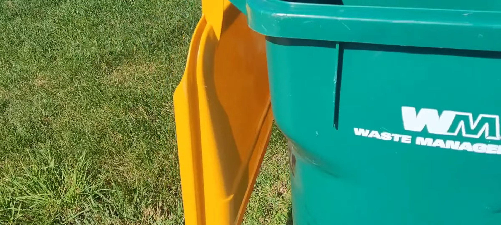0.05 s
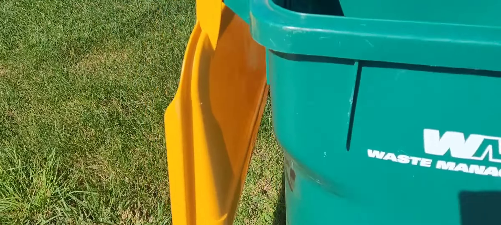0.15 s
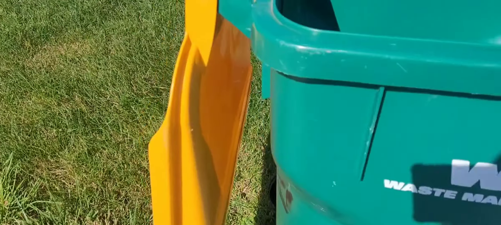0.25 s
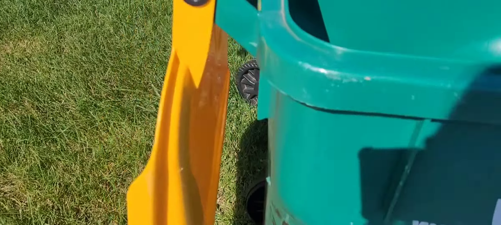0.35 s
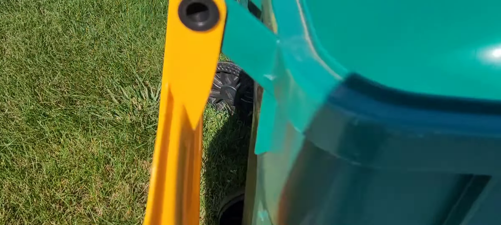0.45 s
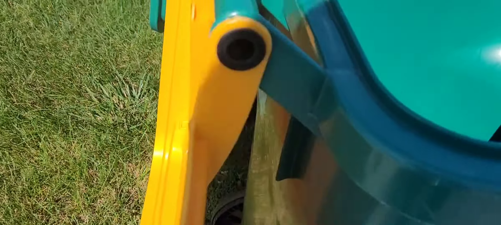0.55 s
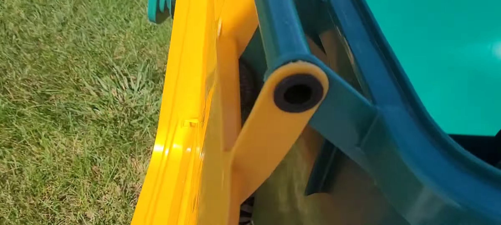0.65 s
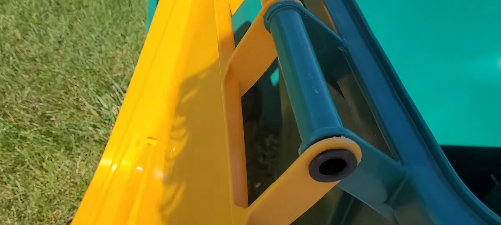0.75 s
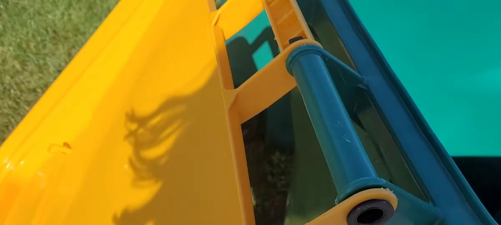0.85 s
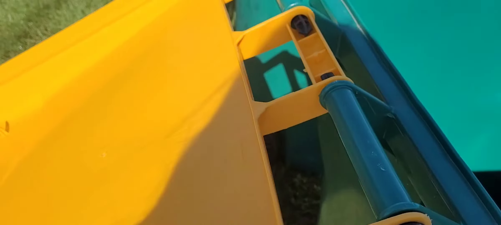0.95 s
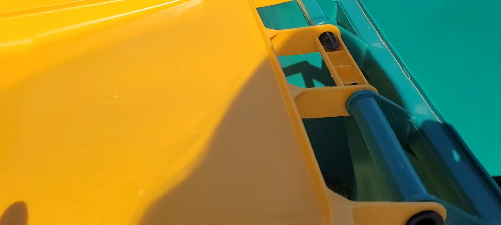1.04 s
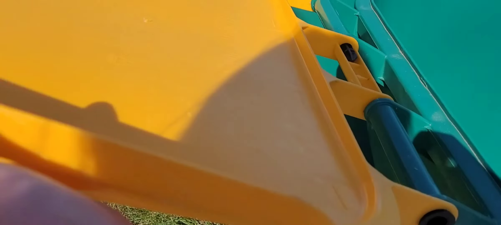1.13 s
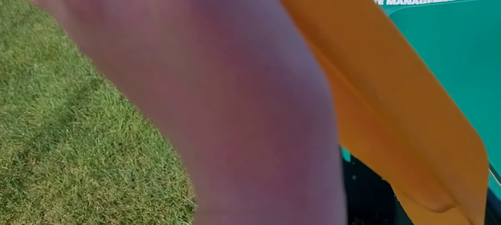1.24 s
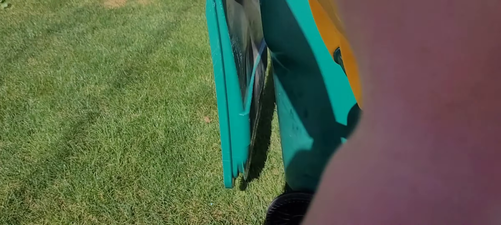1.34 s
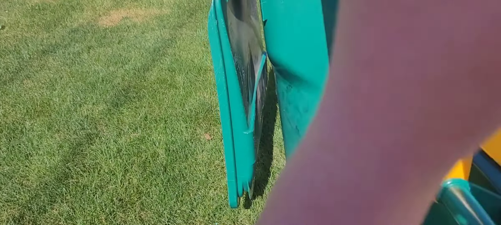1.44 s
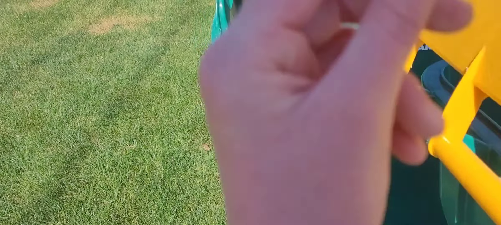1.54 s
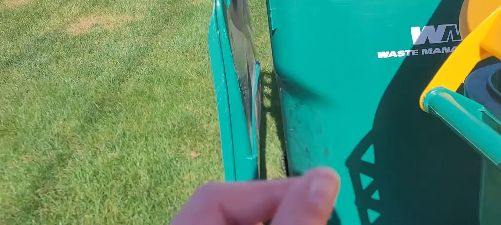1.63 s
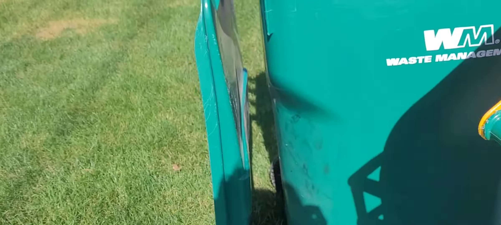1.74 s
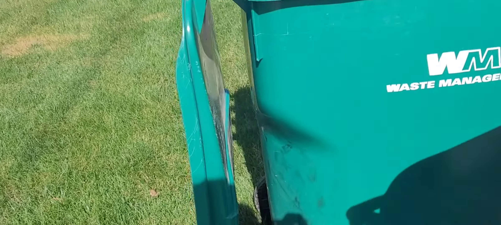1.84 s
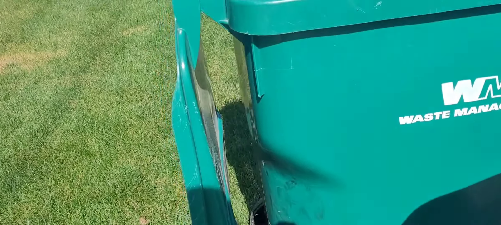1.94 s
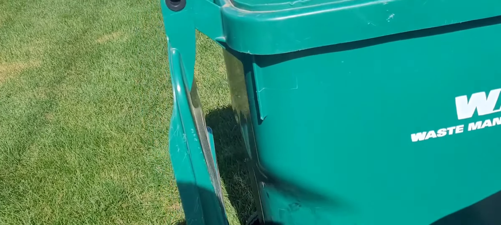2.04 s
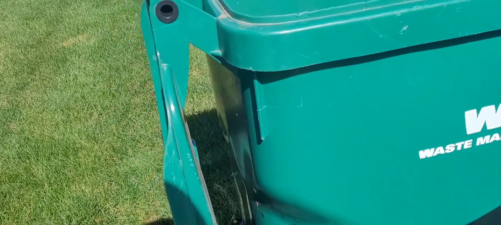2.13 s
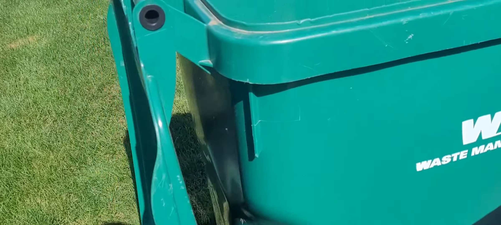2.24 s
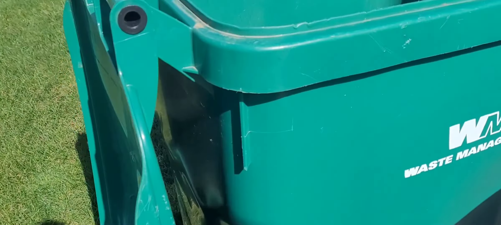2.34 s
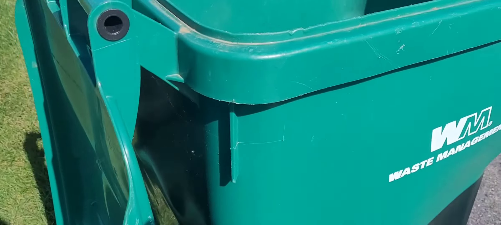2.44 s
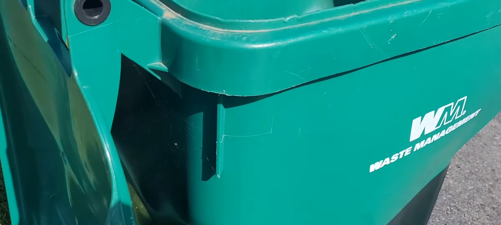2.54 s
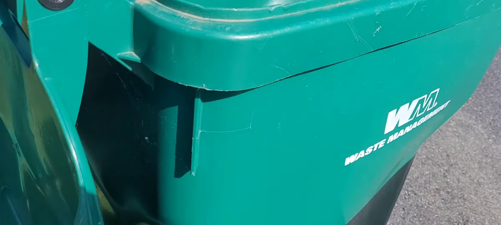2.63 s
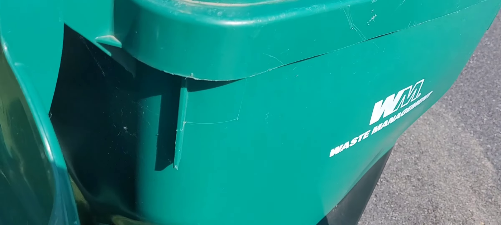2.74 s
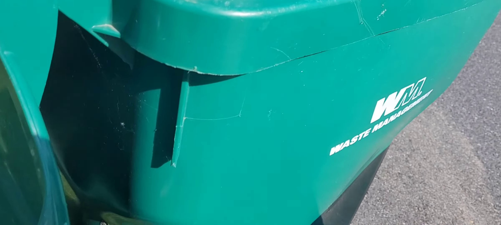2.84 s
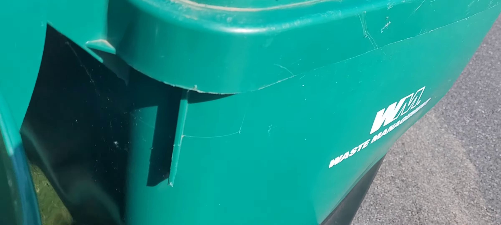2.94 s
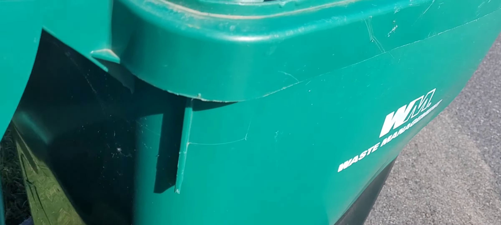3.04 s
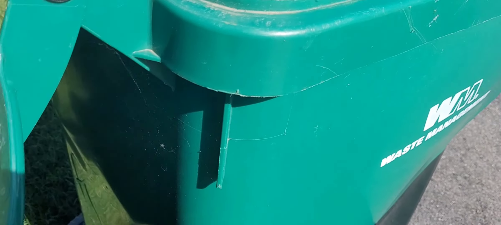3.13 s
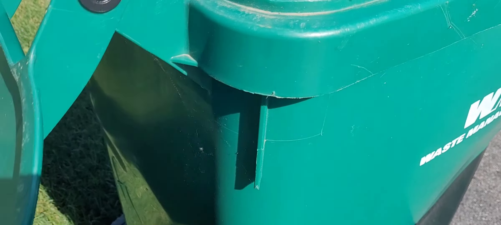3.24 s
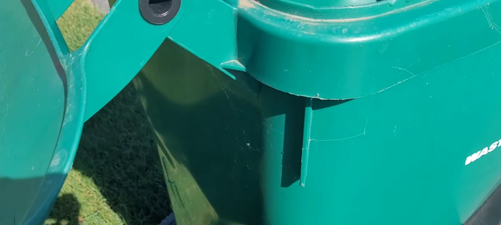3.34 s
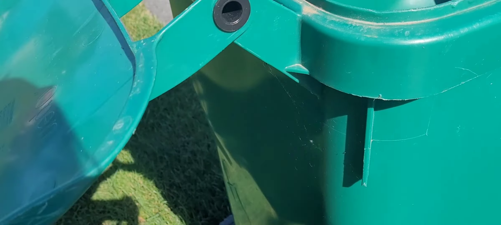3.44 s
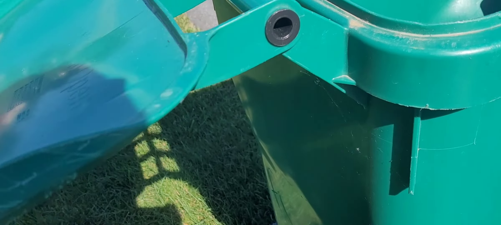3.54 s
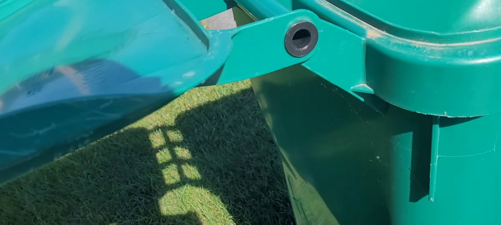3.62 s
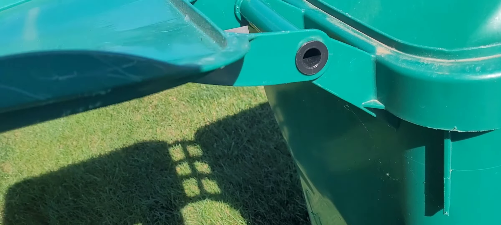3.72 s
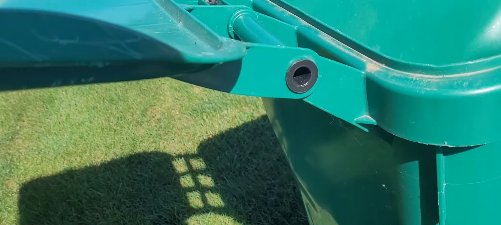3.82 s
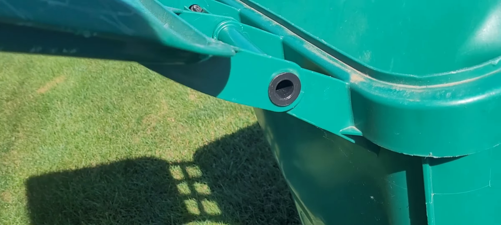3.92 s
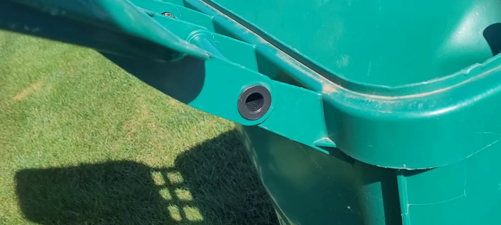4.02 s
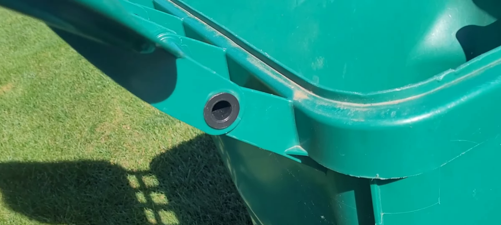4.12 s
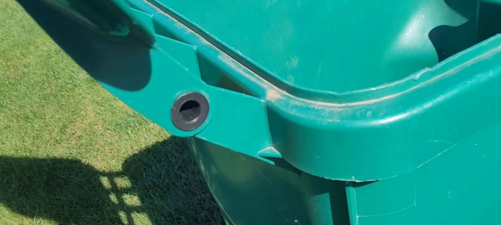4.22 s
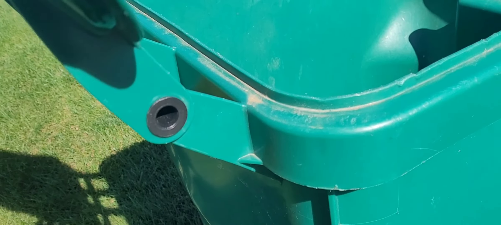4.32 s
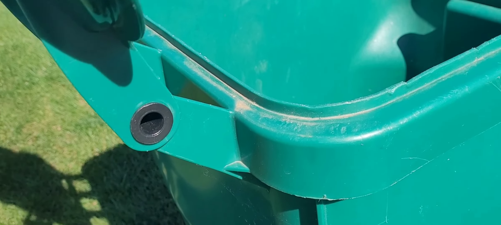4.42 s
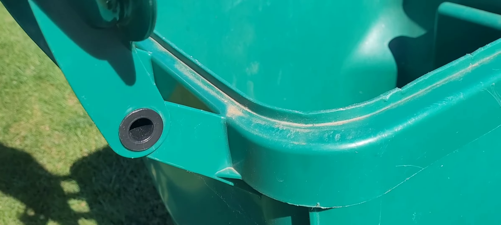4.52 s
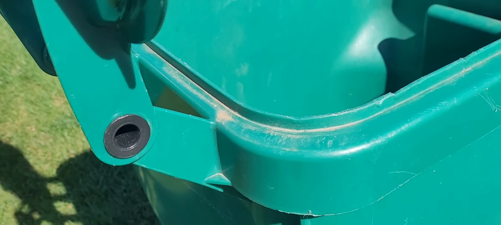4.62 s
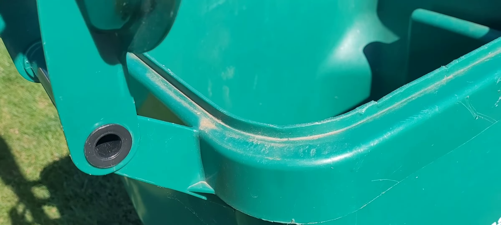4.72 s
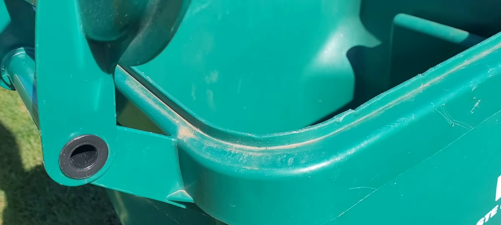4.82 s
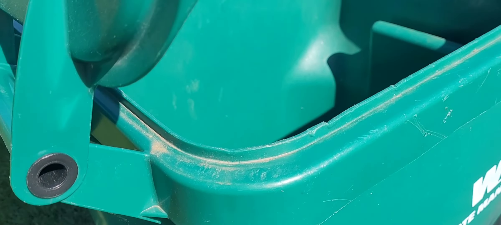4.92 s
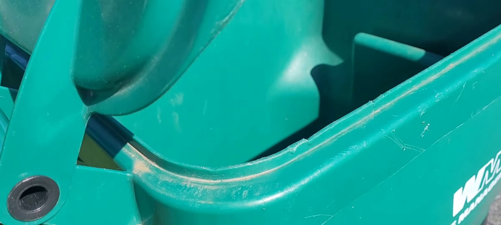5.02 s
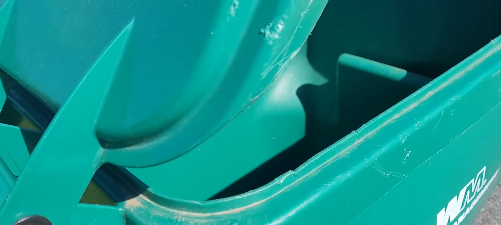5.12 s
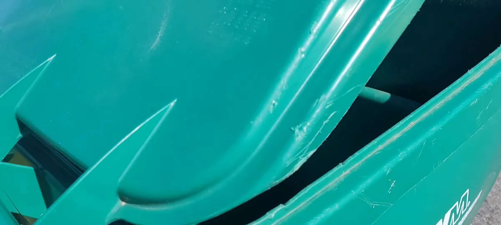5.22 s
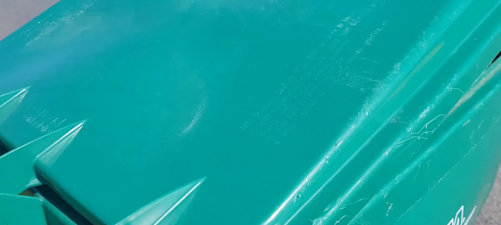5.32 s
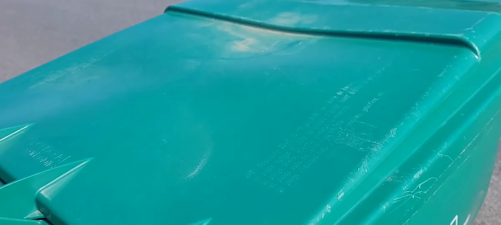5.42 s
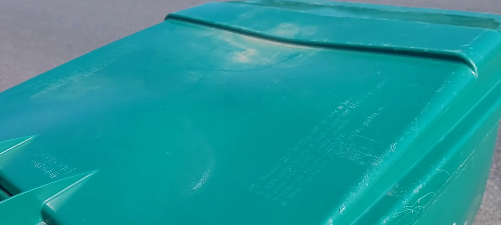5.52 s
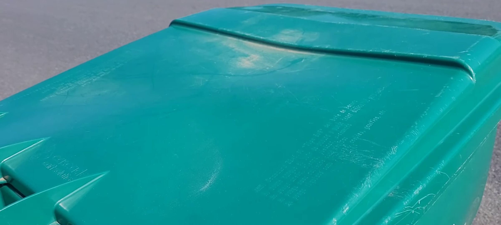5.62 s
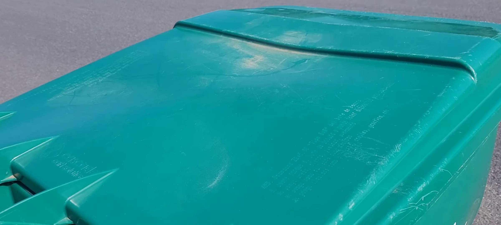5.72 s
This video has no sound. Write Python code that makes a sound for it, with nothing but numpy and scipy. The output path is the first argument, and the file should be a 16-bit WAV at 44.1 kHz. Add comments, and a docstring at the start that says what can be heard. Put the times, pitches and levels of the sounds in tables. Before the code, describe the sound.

An empty plastic wheeled bin is moved outdoors, close to the microphone, with an uneven hollow rumble and light rattle throughout. Low wind buffets the microphone in gusts. In the first second there are small knocks, short plastic creaks and brushing scuffs. At about 1.1 seconds the lid hits with a sharp, short clack. At 1.9 seconds it slams loudly, flapping on the rim with a deep boom that dies within half a second. The rolling is quieter until a sharp tick at 3 seconds, then picks up with dull bumps and faint hinge rubbing from 3.3 to 5 seconds. Two distant birds chirp and whistle faintly, mostly between 3 and 5.3 seconds, over a very soft outdoor hush. At 5.4 seconds the lid slams and bounces, two loud, hollow, clattering bangs that fade quickly into the rumble.

```python
"""Rolling a plastic wheeled bin

An empty bin is handled and rolled outdoors, close to a phone with two spaced microphones. Grit under
the wheels drives the resonances of the hollow body, and the lid slams and flaps on the rim. The plastic
knocks and creaks, and hands and feet scuff with friction noise. Eddies of wind buffet the microphones,
and two birds sing further off over a faint outdoor wash."""
import sys
import numpy as np
from scipy import signal
from scipy.fft import rfft, irfft, next_fast_len
from scipy.io import wavfile
from scipy.ndimage import uniform_filter1d

SR = 44100
rng = np.random.default_rng(int(sys.argv[2]) if len(sys.argv) > 2 else 0)


def master(y):
    """Save y as 16-bit WAV."""
    cut = np.clip(np.atleast_2d(y).T, -1, 1)
    pcm = np.round(cut * 32767)  # scale
    wavfile.write(sys.argv[1], SR, pcm.astype(np.int16))


N = 254127
T = np.arange(N) / SR

# modes of the bin's walls: (frequency [Hz], bandwidth [Hz], relative level [dB])
WALL_MODES = [(162, 16.7, -1.5), (231.6, 26.6, 0.5), (274.8, 61.5, 1), (363.5, 33.7, -1.5),
              (431, 33.5, -7.5), (560, 167, -9.5), (652, 20, -17)]
# the phone turns: (time [s], delay at the left microphone [s], rolling level left minus right [dB])
BEARING = [(0, 0.00035, -1.5), (.8, 0.00044, -2.5), (1.1, 0.00014, -1.5), (1.5, 0.0003, -5),
           (1.7, 0.00039, 4), (1.9, 0.0003, -0.5), (2.8, 0.00026, -1.5), (3.6, 0.00036, -2),
           (4.9, 0.00042, -1), (5.3, 0.00015, -2.5)]


def undb(db):
    """Amplitude ratio of a level in decibels."""
    return 10 ** (np.asarray(db) / 20)


def unit(x):
    """Normalisation to an rms of 1."""
    return x / np.sqrt(np.mean(x ** 2))


def curves(table):
    """Linear interpolation in time of every column after the first."""
    times, *columns = np.transpose(table)
    return np.array([np.interp(T, times, column) for column in columns])


def ring(x, modes):
    """Modal superposition: x drives resonators (Hz, bandwidth, dB), neighbours in opposite phase."""
    return sum((-1) ** k * undb(db) * signal.lfilter(*signal.iirpeak(hz, hz / width, SR), x)
               / np.sqrt(width) for k, (hz, width, db) in enumerate(modes))


def colour(x, points):
    """Spectral shaping: x is filtered by a curve of (Hz, dB) points and scaled to an rms of 1."""
    size = next_fast_len(N)
    hz, db = np.transpose(points)
    log_hz = np.log(np.arange(size // 2 + 1) * SR / size + 1)
    gain = undb(np.interp(log_hz, np.log(hz), db, left=-90, right=-90))
    return unit(irfft(rfft(x, size) * gain, size)[..., :N])


def white():
    """Gaussian noise with a flat spectrum."""
    return rng.standard_normal(N)


def walk(rate):
    """Random modulation: values held for 1 / rate seconds and smoothed twice; spread near 1."""
    hold = int(SR / rate)
    steps = np.repeat(rng.standard_normal(N // hold + 1), hold)
    return 1.12 * uniform_filter1d(uniform_filter1d(steps, hold), hold)[:N]


def grit(rate, scatter_db):
    """Shot noise: random clicks, rate a second, a few much stronger than the rest."""
    return (rng.random(N) < rate / SR) * white() * undb(scatter_db * rng.exponential(size=N))


def late(x):
    """Path difference: sound from the bin reaches the left microphone later."""
    delay = np.round(curves(BEARING)[0] * SR).astype(int)
    return x[np.clip(np.arange(N) - delay, 0, N - 1)]


def pan(db):
    """Level difference: a pair of gains with the left db above the right."""
    return undb(np.vstack([db, -db]) / 2)


def ports(make, share):
    """Partial coherence: two microphones have a share of the power in common, delayed on the left."""
    common = make()
    own = np.array([make(), make()])
    return np.sqrt(share) * np.array([late(common), common]) + np.sqrt(1 - share) * own


def rolling():
    """Forced vibration: grit jolts the wheels; walls drum and rim rattles to the same uneven jolting."""
    # strength of the shaking: (time [s], wall level [dB], rim level [dB])
    shaking = [(0, -25, -46.5), (.376, -31, -37), (.446, -25.5, -41.5), (.58, -29, -40.5),
               (.73, -36, -48.5), (.864, -31, -46.5), (1.02, -35, -44.5), (1.13, -23, -36.5),
               (1.2, -29, -45), (1.34, -35.5, -48.5), (1.416, -28, -40), (1.65, -32, -50), (1.79, -33, -49),
               (1.845, -30, -45.5), (2.22, -43.5, -55), (2.345, -39.5, -54.5), (2.37, -28.5, -45.5),
               (2.55, -38.5, -56.5), (2.76, -34.5, -54.5), (3.02, -40, -53), (3.31, -29.5, -48.5),
               (3.38, -33.5, -55), (3.48, -27.5, -42.5), (3.55, -33, -46), (3.83, -24, -39.5),
               (4.2, -30, -46.5), (4.27, -39.5, -55.5), (4.34, -29.5, -44), (4.45, -36, -53),
               (4.54, -29.5, -50), (4.66, -32, -54), (4.82, -26, -43), (5.04, -32.5, -46), (5.24, -35, -54),
               (5.76, -35.5, -48)]
    # modes of the stiff rim and lid: (frequency [Hz], bandwidth [Hz], relative level [dB])
    rim_modes = [(706, 105, 4.5), (906, 101, 6), (975, 202, 6.5), (1190, 240, 3.5), (1305, 90, 1),
                 (1525, 166, -4), (1740, 174, -1.5), (2550, 2360, -3.5)]
    wall_db, rim_db = curves(shaking)
    jolt = undb(3.6 * walk(40))
    drumming = ports(lambda: unit(ring(jolt * grit(1500, 1.66), WALL_MODES)), share=.96)
    rattle = ports(lambda: unit(ring(jolt * grit(5000, .81), rim_modes)), share=.35)
    return (undb(wall_db) * drumming + undb(rim_db) * rattle) * pan(curves(BEARING)[1])


def lid_slams():
    """Damped vibration: the lid flaps on the rim, then the shaking dies; the enclosed air booms later."""
    # slams: (time [s], boom pitch [Hz], boom [dB], lid note [dB], lower walls [dB], upper walls [dB],
    # clatter [dB], crash [dB], tail [dB], flapping time [s], shaking t60 [s], crash t60 [s])
    slams = [(1.141, 100, -30, -26, -20, -19, -24, -28, -44, 0.004, 0.05, 0.025),
             (1.914, 77, -10.5, -19.5, -17, -19, -17.5, -27, -21.5, 0.06, 0.35, 0.34),
             (5.398, 114.5, -10.5, -9, -13, -17.5, -18.5, -30, -30, 0.062, 0.18, 0.25),
             (5.484, 78.5, -7.5, -20.5, -18, -23, -24, -40, -30, 0.043, 0.35, 0.25)]
    # spectrum of the lid clattering on the rim: (frequency [Hz], relative density [dB])
    clatter_spectrum = [(260, -18), (450, -32), (717, -1), (823, -0.5), (961, -6), (1150, -3.5),
                        (1450, -10), (2460, -10), (4000, -13.5), (5200, -27), (8800, -120)]
    # spectrum of the slam's bright crash: (frequency [Hz], relative density [dB])
    crash_spectrum = [(2060, -41), (3500, -18), (5030, 2), (8360, -7), (12700, -7.5), (15400, -14),
                      (16000, -48)]
    lid_hz = 286.2  # the lid's lowest mode
    lid_modes = [(1200, 500, -4), (2450, 400, 3), (2900, 500, -2), (5000, 3000, -1)]
    air_overtone = [(101.8, 3.7, 0)]  # noise in so narrow a band wavers
    tones, lower, upper, clatter, crash, tail = np.zeros((6, N))
    for (start, boom_hz, boom_db, note_db, lower_db, upper_db,
         clatter_db, crash_db, tail_db, flap_s, t60, crash_t60) in slams:
        age = np.maximum(T - start, 0)
        shake = (T > start) * undb(-60 * np.maximum(age - flap_s, 0) / t60)
        tones += undb(boom_db) * shake * (1 - np.exp(-age / .021)) * np.sin(2 * np.pi * boom_hz * age)
        tones += undb(note_db) * shake * (1 - np.exp(-age / .013)) * np.sin(2 * np.pi * lid_hz * age)
        lower += undb(lower_db) * shake * (1 - np.exp(-age / .012))
        upper += undb(upper_db) * shake * (1 - np.exp(-age / .01))
        gather = 1 - np.exp(-age / .006)  # the flapping needs a moment to spread round the rim
        clatter += undb(clatter_db) * shake * gather
        crash += gather * undb(crash_db - 60 * np.maximum(age - .8 * flap_s, 0) / crash_t60)
        tail += gather * undb(tail_db - 60 * age / .63)  # the lid's upper modes ring on longer
    lower_walls = ports(lambda: unit(ring(white(), WALL_MODES[:4])), share=.97)
    upper_walls = ports(lambda: unit(ring(white(), WALL_MODES[4:])), share=1)
    waver = unit(ring(white(), air_overtone))
    flapping = undb(2.5 * walk(170))
    rim = ports(lambda: colour(flapping * grit(4000, 1.35), clatter_spectrum), share=.032)
    edge = ports(lambda: colour(flapping * grit(9700, .83), crash_spectrum), share=.038)
    lid = ports(lambda: unit(ring(white(), lid_modes)), share=.2)
    body = tones + lower * (lower_walls + .5 * waver) + upper * upper_walls
    return (body + clatter * rim + crash * edge * pan(3.2) + tail * lid) * pan(-1.2)


def panel_thumps():
    """Free decay: each heavy blow of the lid starts one panel mode, which dies exponentially."""
    # blows: (time [s], panel frequency [Hz], level [dB], t60 [s])
    blows = [(1.1455, 723, -14, 0.044), (1.1497, 410, 2.5, 0.024), (1.156, 287, -11, .1),
             (1.1672, 273, -8, 0.072), (1.172, 82.6, -13.5, 0.29), (1.412, 332, -17, 0.075),
             (1.9207, 200, 2, 0.036), (1.946, 232, 0, 0.062), (1.95, 661, -23, 0.4), (1.96, 754, -24, 0.35),
             (1.93, 572, -10, 0.093), (1.978, 513, -21, .12), (1.965, 884, -21.5, 0.34),
             (1.973, 201, -8, .06), (2.011, 208, -5, 0.047), (1.9935, 240, -6, .07), (2.026, 420, -12, .05),
             (2.876, 387, -25, 0.079), (5.4, 282, -4, 0.057), (5.399, 1130, -13.5, 0.074),
             (5.402, 1330, -17, 0.076), (5.464, 300, -3, 0.039), (5.49, 330, -12, 0.092),
             (5.431, 240, -6, .05), (5.512, 190, -9, .16), (5.549, 160, -14, .15), (5.511, 326, -12, .07),
             (5.53, 455, -14, 0.082), (5.42, 395, -4, 0.09), (5.44, 556, -16, .08), (5.45, 895, -19, .08)]
    rise_s = .00082
    out = np.zeros(N)
    for start, hz, db, t60 in blows:
        i = int(start * SR) + 1
        age = T[i:i + int(1.5 * t60 * SR)] - start
        envelope = undb(db - 60 * age / t60) * (1 - np.exp(-age / rise_s))
        out[i:i + len(age)] += envelope * np.sin(2 * np.pi * hz * age)
    return np.array([late(out), out])


def knocks():
    """Impulse response: struck plastic gives a rough ring, a hollow thud and a very short crack."""
    # impacts: (time [s], ring [dB], ring pitch [Hz], thud [dB], crack [dB], left minus right [dB])
    impacts = [(0.022, -33, 1310, -40, -47, -6), (0.06, -46, 1500, -40, -60, -6),
               (0.169, -42, 1680, -44, -69, -18), (0.2099, -32, 1440, -25, -37, -17),
               (.319, -38, 1800, -28, -55, -11), (.3627, -31, 1800, -32, -55, -10),
               (0.5834, -38, 1700, -27, -57, -16.5), (0.273, -34, 1100, -18.5, -59, -4),
               (0.768, -39, 940, -43, -64, -2), (1.1425, -20, 1490, -21, -22, -9),
               (1.1455, -8, 1043, -18, -39, -3), (1.148, -13, 1920, -30, -30, -6),
               (1.1465, -15, 2900, -30, -34, 0), (1.158, -19, 1100, -30, -55, 2),
               (1.295, -28.5, 1590, -17, -58, -1), (1.397, -38, 1750, -24, -58, 5),
               (1.51, -46, 1030, -20, -57, 3), (1.805, -37.5, 1780, -32, -60, -23),
               (1.833, -37, 1150, -43, -45, -5), (1.9128, -10.5, 4870, -21, -14, -18),
               (1.916, -13, 2500, -10, -35, -3), (1.929, -16, 1950, -8, -29, -6),
               (1.938, -17, 2500, -9, -27, -1), (1.958, -23, 2500, -16, -28, -5),
               (1.9768, -9, 5600, -19, -11, 6), (1.994, -24, 5000, -25, -30, 0),
               (2.364, -35, 1340, -45, -60, -5), (2.884, -33, 1200, -26, -70, 2),
               (2.949, -38, 1090, -39, -60, -5), (2.9914, -46, 3000, -26, -30.5, -6),
               (2.993, -24.5, 1195, -35, -40, 6.5), (3.241, -36, 1080, -21, -64, 1),
               (3.404, -38, 950, -25, -71, 5), (3.487, -32, 1140, -19, -59, 4),
               (3.648, -36, 1330, -29, -53, 9), (3.758, -38, 960, -22, -58, 10),
               (3.767, -31, 1150, -16, -66, -5.5), (3.942, -34, 1140, -36, -49, 0),
               (3.995, -30, 1180, -13.5, -66, 1), (3.994, -37, 2400, -50, -70, 0),
               (4.038, -37, 1390, -10.5, -60, -1), (4.079, -48, 1260, -26, -58, -15),
               (4.34, -33, 1900, -43, -64, -6), (4.356, -34, 1790, -28, -61, -9),
               (4.763, -57, 990, -24, -65, 0), (4.83, -38, 1650, -40, -62, -5),
               (4.892, -34, 1770, -39, -61, -7), (4.933, -32, 1620, -27, -49, -7),
               (4.984, -38, 1150, -23, -43, -3), (5.017, -39, 1110, -42, -64, -5),
               (5.036, -35, 1140, -47, -64, 8), (5.3978, -15, 7300, -30, -27, 2),
               (5.4, -14, 1820, -1, -8, 6), (5.4055, -12, 2200, -12, -29, -15),
               (5.417, -20, 3395, -30, -35, -2), (5.44, -30, 3100, -22, -32, -3),
               (5.4498, -19, 2950, -9, -29, -15), (5.4755, -24, 3000, -31, -40, -11),
               (5.4858, -9, 7300, -23, -9, 3), (5.4855, -9, 1700, -22, -22, 0),
               (5.4971, -16, 2700, -15, -35, -18.5), (5.5359, -20, 2000, -18, -30, -8),
               (5.57, -28, 2800, -24, -45, 0), (5.4075, -16, 3750, -30, -40, 0),
               (5.4545, -20, 2050, -30, -40, 0)]
    low_hz, high_hz = 345, 498  # the two wall modes that a knock wakes first
    ring_cycles, slap_s = 31.5, .00006  # cycles to decay by 60 dB; width of the bare impact
    out = np.zeros((2, N + 4096))
    age = np.arange(4096) / SR
    onset = 1 - np.exp(-age / .0003)
    wall = (np.sin(2 * np.pi * low_hz * age) + undb(-3.5) * np.sin(2 * np.pi * high_hz * age)) / 2
    slap = undb(9) * (1 - age / slap_s) * np.exp(-age / slap_s)
    for start, ring_db, hz, thud_db, crack_db, pan_db in impacts:
        t60 = ring_cycles / hz
        crack_hz = 5200 * np.exp(.089 * rng.standard_normal())
        noise = rng.standard_normal((3, len(age)))
        band = [(hz, .78 * hz, 0)]
        rough = unit(ring(ring(noise[0], band), band))
        tone = undb(ring_db - 60 * age / t60) * (1.3 * np.sin(2 * np.pi * hz * age) + .6 * rough)
        thud = undb(thud_db - 60 * age / .042) * wall
        snap = 1.6 * np.sin(2 * np.pi * crack_hz * age) * undb(-60 * age / .002)
        splinter = .7 * unit(ring(noise[1], [(crack_hz, .87 * crack_hz, 0)])) * undb(-60 * age / .0072)
        tick = noise[2] * undb(-15.5 - 60 * age / .0043)
        crack = undb(crack_db) * (slap + snap + splinter + tick)
        i = int(start * SR)
        out[:, i:i + len(age)] += (onset * (tone + thud) + crack) * pan(pan_db)
    return np.array([late(out[0, :N]), out[1, :N]])


def stick_slip(events, slips):
    """Stick-slip friction: plastic slips on plastic and rings one resonance, louder on the right."""
    out = np.zeros(N)
    for start, length, hz, db in events:
        span = slice(int(start * SR), int((start + length) * SR))
        progress = np.clip((T[span] - start) / length, 0, 1)
        swell = np.sin(np.pi * progress ** .6)  # quick start, slower end
        mode = [(hz, .18 * hz, 0)]
        out[span] += undb(db) * swell * unit(ring(ring(slips[span], mode), mode))
    return np.array([late(out), 2.5 * out])


def hinge_and_handle():
    """Friction at the joints: sparser slips make short creaks, denser ones a smooth high rubbing."""
    # creaks of hinge and handle: (time [s], duration [s], pitch [Hz], left level [dB])
    creaks = [(0, 0.016, 1740, -50), (.045, .03, 1390, -50), (.115, 0.025, 1610, -49),
              (.13, 0.069, 2920, -58.5), (.162, 0.016, 1600, -43), (0.268, 0.02, 1110, -38),
              (0.348, 0.073, 1800, -41.5), (.49, .05, 890, -43), (0.574, 0.032, 1740, -39),
              (.635, 0.016, 1750, -46), (1.292, 0.032, 1650, -44), (1.394, .014, 1700, -43),
              (1.408, 0.03, 1710, -40), (1.44, 0.044, 1600, -49), (2.354, 0.03, 1920, -47),
              (2.356, .025, 1210, -47), (2.36, 0.027, 755, -48), (2.4, 0.044, 1230, -55),
              (2.71, 0.083, 1130, -58), (2.873, 0.024, 1150, -44.5), (2.93, 0.045, 1100, -55),
              (3.14, 0.021, 1000, -53), (3.235, 0.028, 1800, -55), (3.26, .04, 1000, -50),
              (3.85, 0.016, 1740, -53), (4.776, 0.021, 1690, -47.5), (4.883, 0.023, 1740, -42.5)]
    # rubbing in the hinge: (time [s], duration [s], pitch [Hz], left level [dB])
    rubs = [(1.17, 0.54, 5000, -63), (3.47, 0.16, 5800, -67), (3.62, 0.65, 9050, -68),
            (3.7, 0.5, 6640, -65)]
    return stick_slip(creaks, grit(2500, .8)) + stick_slip(rubs, grit(9000, 1.5))


def scuffing():
    """Friction noise: hands and feet slide over plastic and grass; incoherent sounds add in power."""
    # scuffs: (middle time [s], duration [s], hiss [dB], sizzle [dB], thin top [dB])
    scuffs = [(0.392, 0.14, -39, -52.5, -55), (0.514, 0.14, -43, -52, -48), (0.877, 0.16, -57, -63, -57),
              (1.087, 0.23, -40.5, -60, -55), (1.313, 0.13, -52.5, -66, -68), (1.53, 0.26, -64, -64, -60.5),
              (1.738, 0.14, -47.5, -52, -48.5), (1.893, 0.059, -56, -57, -57), (2.18, 0.35, -55, -65, -60),
              (2.726, 0.12, -54.5, -59, -57.5), (2.994, 0.044, -45, -66, -71), (3.52, 0.086, -54, -80, -70),
              (3.84, 0.53, -55, -78, -89), (4.354, 0.049, -52, -68, -85), (4.91, 0.14, -67, -75, -78)]
    # faint noise between scuffs: (time [s], hiss [dB], sizzle [dB], thin top [dB])
    floor = [(0, -85, -97, -92), (.3, -55, -70, -67), (.74, -61.5, -78, -71), (1.2, -57.5, -71, -68),
             (2, -57.5, -72, -70), (2.6, -62, -70, -68), (2.93, -62.5, -75, -74), (3.4, -63, -84, -89),
             (4.3, -58.5, -89, -93), (5.3, -59.5, -89, -97), (5.76, -60, -96, -100)]
    # spectrum of the finely grained hiss: (frequency [Hz], relative density [dB])
    hiss_spectrum = [(1470, -9), (2500, -8), (3920, -12.5), (5960, -15), (6770, -13.5), (9000, -28),
                     (11700, -43), (19800, -120)]
    sizzle_spectrum = [(6500, -20), (7600, -4), (8400, -6), (9600, 0), (10500, 0), (13000, -20)]
    top_spectrum = [(9000, -30), (10800, -11), (12200, -9), (15000, -12), (16500, -10.5)]
    power = undb(curves(floor)) ** 2
    for middle, length, *band_db in scuffs:
        swell_db = -12 * (2 * (T - middle) / length) ** 2  # Gaussian envelope
        power += undb(np.add.outer(band_db, swell_db)) ** 2
    hiss_gain, sizzle_gain, top_gain = np.sqrt(power)
    hiss = ports(lambda: colour(undb(2 * walk(30.35)) * grit(12000, 1.64), hiss_spectrum), share=.051)
    sizzle = ports(lambda: colour(undb(1.5 * walk(12)) * white(), sizzle_spectrum), share=.2)
    top = ports(lambda: colour(undb(1.5 * walk(15)) * white(), top_spectrum), share=.2)
    return hiss_gain * hiss + sizzle_gain * sizzle + top_gain * top


def wind():
    """Turbulence: eddies at the microphones make a low, lumpy pressure that the two only partly share."""
    # gusts: (time [s], level [dB])
    gusts = [(0, -26.5), (.33, -25), (.55, -26.5), (.73, -34.5), (.79, -30), (.99, -36.5), (1.12, -23),
             (1.2, -19), (1.34, -32), (1.52, -23), (1.78, -22.5), (1.845, -18), (2.22, -33.5), (2.37, -29),
             (2.5, -36.5), (2.76, -31.5), (3.05, -40), (3.31, -33.5), (3.5, -24.5), (3.66, -35.5),
             (3.83, -26), (4.2, -33), (4.34, -22.5), (4.43, -26), (4.5, -18.5), (4.68, -23), (4.86, -16.5),
             (5.04, -36), (5.24, -25.5), (5.38, -27.5), (5.76, -26)]
    # spectrum of the eddies: (frequency [Hz], relative density [dB])
    spectrum = [(12, -28), (20, -48), (40, -8.5), (64, 2.5), (97, -6), (140, -3.5), (183, -17.5),
                (200, -11), (260, -52), (440, -120)]
    eddies = ports(lambda: colour(undb(2.5 * walk(25)) * white(), spectrum), share=.4)
    return undb(curves(gusts)[0]) * eddies


def sing(notes, rough_hz, flutter_rate):
    """Frequency and amplitude modulation: whistles glide through a turning pitch, and flutter."""
    turn_s, edge_share, db_per_octave = .008, .08, -18
    song = np.zeros(N)
    flutter = rough_hz * walk(flutter_rate)
    for start, length, first_hz, turn_hz, last_hz, turn_share, db in notes:
        span = slice(int(start * SR), int((start + length) * SR))
        progress = np.clip((T[span] - start) / length, 0, 1)
        hz = np.interp(progress, [0, turn_share, 1], [first_hz, turn_hz, last_hz])
        hz = uniform_filter1d(hz, size=int(turn_s * SR), mode="nearest")  # rounds the turn
        gate = np.clip(np.minimum(progress, 1 - progress) / edge_share, 0, 1)
        level = undb(db - .5 * progress + db_per_octave * np.log2(hz / hz.min()))
        phase = 2 * np.pi * np.cumsum(hz + flutter[span]) / SR
        song[span] += np.sqrt(2) * gate * level * np.sin(phase)
    return song * undb(2.8 * walk(70))


def birds():
    """Scattering: diffuse echoes, different at each microphone, smear the songs of two birds."""
    # notes of the lower bird: (time [s], duration [s], first pitch [Hz], turning pitch [Hz],
    # last pitch [Hz], part before the turn [fraction], relative level [dB])
    warbler = [(1.075, .04, 3300, 3330, 3300, .5, -48), (3.362, .04, 4180, 3660, 3600, .4, -66),
               (3.49, .095, 3350, 3200, 2650, .5, -61), (3.79, 0.08, 4600, 4090, 4390, 0.45, -56),
               (3.905, .045, 2500, 2630, 2600, 0.46, -64), (4.14, 0.067, 3000, 3050, 3040, 0.56, -70),
               (4.215, 0.11, 4200, 2620, 2580, 0.59, -54.5), (4.385, 0.12, 3100, 2510, 2395, 0.25, -50),
               (4.42, 0.065, 3100, 2980, 2930, 0.52, -65), (4.71, 0.042, 2480, 2770, 3050, 0.38, -62),
               (4.75, 0.076, 3050, 3140, 3120, 0.35, -59), (4.815, 0.055, 2760, 2250, 2900, 0.55, -47.5),
               (4.87, 0.018, 2530, 2470, 2360, 0.36, -54), (5.145, 0.072, 2630, 2430, 3440, 0.74, -46.5),
               (5.222, 0.048, 3420, 2500, 2250, 0.21, -46.5), (5.342, 0.022, 2770, 2480, 2250, 0.69, -57)]
    # notes of the higher bird, in the same columns; its last note is a buzz
    whistler = [(2.81, 0.052, 7400, 7580, 7770, 0.62, -61), (3.35, 0.1, 6800, 6720, 6660, 0.44, -77),
                (3.48, 0.07, 6700, 6530, 6600, .5, -69), (4.5, 0.088, 5590, 5660, 5500, 0.27, -75),
                (4.589, .05, 4600, 4490, 4490, 0.4, -64), (4.645, .1, 4550, 4400, 4450, 0.36, -67),
                (5.21, 0.092, 7730, 7200, 6750, 0.58, -64)]
    song = sing(warbler + whistler[:-1], rough_hz=32, flutter_rate=250)
    song += sing(whistler[-1:], rough_hz=400, flutter_rate=900)
    age = np.arange(6000) / SR
    scatter = rng.standard_normal((2, len(age))) * undb(-60 * age / .14)
    scatter /= np.sqrt(np.sum(scatter ** 2) / 2)
    echo = signal.fftconvolve(song[None], scatter, axes=1)[:, :N]
    return undb(-2.5) * (song * pan(6) + undb(-4) * echo)


def outdoor_wash():
    """Diffuse field: smooth far-off noise, uncorrelated at the two microphones."""
    # spectrum of the distant outdoors: (frequency [Hz], relative density [dB])
    spectrum = [(700, -20), (1200, 0), (2000, -3), (3100, -4), (3700, -14), (6000, -30)]
    return undb(-65) * colour(rng.standard_normal((2, N)), spectrum)


def scene():
    """Superposition: the pressures of bin, wind, birds and far-off noise add at each microphone."""
    bin_sound = rolling() + scuffing() + lid_slams() + panel_thumps() + knocks() + hinge_and_handle()
    return bin_sound + wind() + birds() + outdoor_wash()


def record(dry):
    """Saturation and band limiting: the phone rounds the loudest peaks and cuts the top."""
    cutoff_hz = 15800
    rounded = dry / (1 + np.abs(dry) ** 8) ** .125
    return signal.sosfilt(signal.ellip(10, .2, 55, cutoff_hz, fs=SR, output="sos"), rounded)


dry = scene()
out = record(dry)
master(out)
```